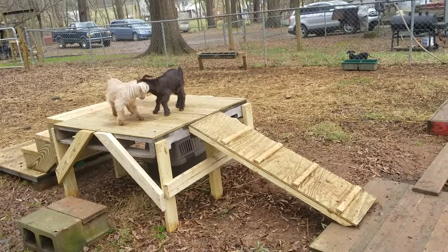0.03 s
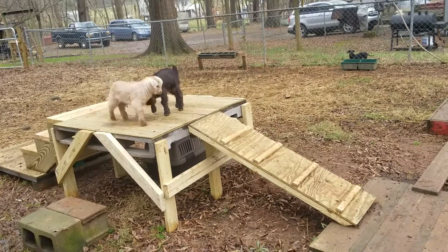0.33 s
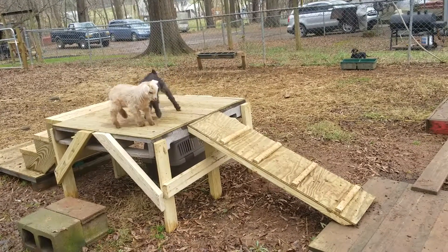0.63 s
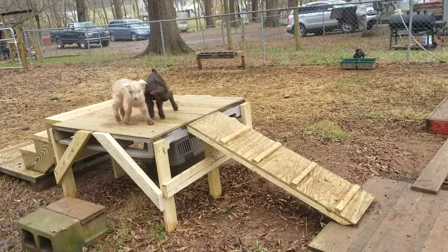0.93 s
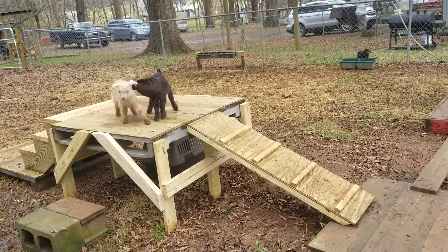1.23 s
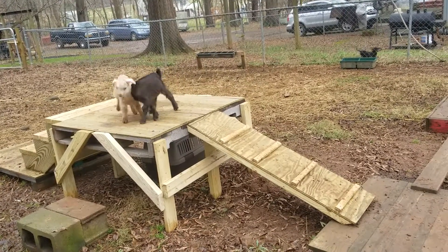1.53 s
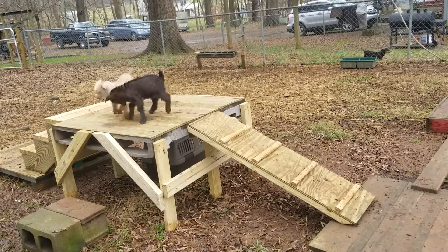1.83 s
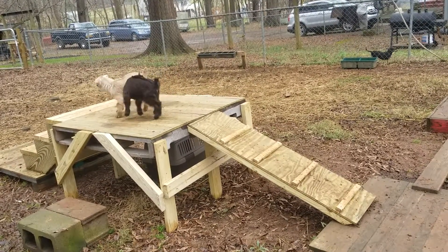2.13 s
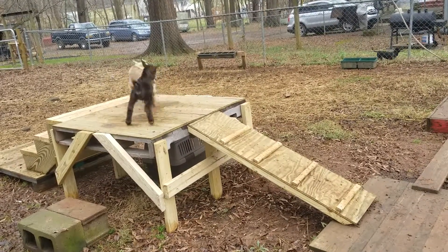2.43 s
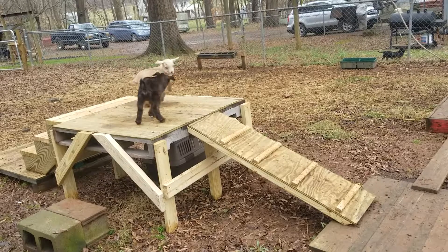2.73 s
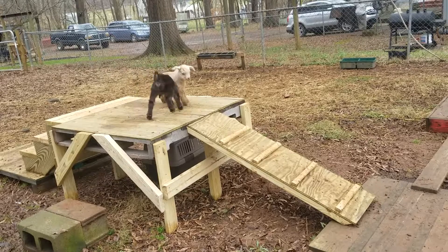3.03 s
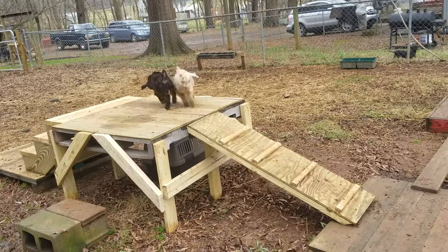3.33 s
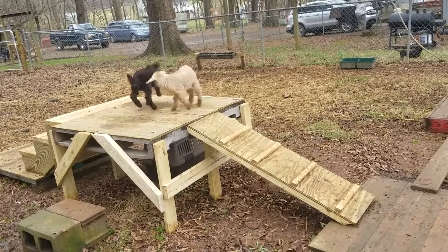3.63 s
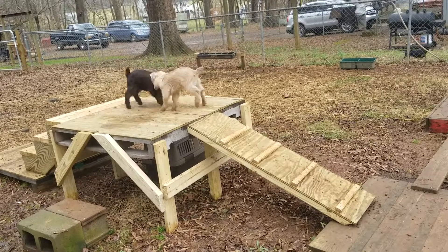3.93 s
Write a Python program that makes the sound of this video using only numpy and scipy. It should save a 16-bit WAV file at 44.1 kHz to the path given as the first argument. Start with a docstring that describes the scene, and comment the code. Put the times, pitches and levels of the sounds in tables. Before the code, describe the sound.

Hooves of two young goats tick and thud unevenly on a raised wooden deck a few metres away, with gritty scuffs between steps. The pattering grows busiest late on, over faint rustling, light wind and a distant hum.

```python
"""Sharp little hoof ticks and hollow thuds: two goat kids step, hop and scuffle on a raised plywood deck.
They are a few metres away in a yard. Each hoof ticks on the surface, knocks the board and makes the
deck thud; between steps the hooves drag over grit. A distant engine-like hum, a light breeze and faint
rustling lie behind. The goats sound much duller in the right microphone than in the left."""
import sys
import numpy as np
from scipy import signal
from scipy.fft import rfft, irfft
from scipy.io import wavfile

SR = 44100
rng = np.random.default_rng(int(sys.argv[2]) if len(sys.argv) > 2 else 0)


def materialize(psi):
    """Save the field psi as 16-bit PCM at rate SR to the path in sys.argv[1].

    A 1-D psi becomes a single channel; in a 2-D psi each row is a channel.
    """
    bounded = np.clip(np.atleast_2d(psi).T, -1, 1)
    quanta = np.round(bounded * 32767).astype(np.int16)
    wavfile.write(sys.argv[1], SR, quanta)


N = 176400
TIME = np.arange(N) / SR

# Tone curves and mode gains are relative; cue levels are trimmed in each layer.
# Low outdoor rumble with thin hiss on top: freq_hz, gain_db
YARD_TONE = [(15, -18), (28, -23), (42, -1), (62, 0.5), (95, 4), (130, -3), (200, -8), (300, -19),
             (500, -31.5), (900, -30.5), (1200, -34), (1520, -25), (2000, -35), (4000, -38.5),
             (9000, -41.5), (13000, -37.5), (16000, -40.5)]
# How alike the yard air is left and right: freq_hz, correlation
YARD_LIKENESS = [(30, 0.066), (80, 1), (200, 0.98), (600, 0.26), (1500, 0), (4000, 0)]
# Fader ride of the far hum: time_s, level_db
HUM_RIDE = [(0, -55.5), (.7, -54), (1.8, -53.5), (2.6, -55), (3.3, -59.5), (4, -60.5)]
# Wind brushing the left microphone: freq_hz, gain_db
WIND_TONE = [(12, -28), (28, -15), (45, 14), (75, 1.5), (140, 4), (220, -19.5), (400, -26), (1200, -47.5)]
# Fader ride of the faint rustling: time_s, level_db
RUSTLE_RIDE = [(0, -68), (.2, -72), (.26, -55.5), (.44, -61.5), (.57, -54.5), (.8, -59.5), (.92, -63),
               (1.25, -57.5), (1.46, -65), (1.62, -59.5), (1.8, -59), (2.05, -55), (2.28, -64.5),
               (2.46, -62), (2.7, -59), (3.2, -56.5), (3.7, -58), (4, -60.5)]
# Papery crackle of dry litter: freq_hz, gain_db
RUSTLE_TONE = [(900, -42.5), (1450, -7), (2100, -36.5), (3800, -20), (4900, -8.5), (6000, -3),
               (6700, -10.5), (7400, -33), (10600, -21.5), (15000, -39)]
# Cues for dragged hooves; each swells by swell_db to reach its levels at the end of the stroke:
# start_s, length_s, grit_db, board_db, sand_db, swell_db
SCUFF_CUES = [(0.259, 0.028, -42, -61, -90, 9), (0.47, 0.073, -51, -64, -68.5, 0.5),
              (0.673, 0.13, -59, -69, -78, -3), (1.177, 0.07, -60.5, -69, -95, -4),
              (1.257, 0.047, -47, -67, -79, 6), (1.322, 0.062, -46, -70, -67, -0.5),
              (1.861, 0.077, -49.5, -59, -80, -2), (1.932, 0.053, -46.5, -73, -71, 10),
              (2.13, 0.079, -46.5, -64, -60, 9.5), (2.323, 0.058, -44, -60, -57.5, 6.5),
              (2.577, 0.038, -49.5, -63.5, -73, -9), (2.703, 0.039, -54.5, -67, -91, -2.5),
              (3.03, 0.051, -55.5, -65, -84, -10), (3.144, 0.04, -33, -53.5, -62, 15.5),
              (3.242, 0.013, -44, -92, -59, -4), (3.267, 0.01, -40.5, -50, -61, 9),
              (3.651, 0.065, -65, -64, -76, 0), (3.772, 0.059, -47, -87, -76, 13),
              (3.901, 0.096, -42, -76, -59, 4.5)]
# Rasp of coarse grit: freq_hz, gain_db
GRIT_TONE = [(800, -25.5), (2000, -8.5), (3200, -11.5), (4200, -4.5), (5200, -3.5), (6000, 3.5),
             (6600, -10), (7600, -24), (9300, -53), (16000, -53)]
# Sizzle of fine sand: freq_hz, gain_db
SAND_TONE = [(6500, -50), (8000, -33), (9500, -10), (10500, 1), (11400, -8), (12600, -16), (16000, -41)]
# Low grumble of the deck under a drag: freq_hz, gain_db
DRAG_TONE = [(60, -30.5), (160, -15.5), (310, 4), (450, -4.5), (650, -32.5), (1500, -36.5)]
# Cues for hoof landings: start_s, thud_db, thud_pitch_hz, knock_db, tick_db, crack_db
HOOF_CUES = [(0.031, -61, 167, -65.5, -50.5, -55), (0.216, -45.5, 280.6, -63.5, -59, -78),
             (0.277, -80, 201, -75, -48, -68), (0.289, -63, 200, -62, -40, -52),
             (0.368, -45, 285, -67.5, -54.5, -52), (0.464, -41.5, 230, -67.5, -49, -60),
             (0.511, -65, 266, -61, -51.5, -48), (0.646, -46, 324, -55, -39, -34),
             (0.741, -48.5, 270, -86, -47.5, -47), (0.93, -61, 249, -53.5, -54, -41),
             (1.165, -44, 261, -51.5, -54, -68), (1.201, -47, 148, -56, -45.5, -41.5),
             (1.369, -46, 221, -83, -42, -39.5), (1.531, -40, 218, -62.5, -49, -56),
             (1.549, -33, 171, -70, -54, -53), (1.605, -44, 180, -57, -47.5, -55),
             (1.694, -71, 170, -84, -39, -74), (1.726, -29, 201, -42, -33, -67),
             (1.858, -79, 210, -60, -45, -59), (1.874, -56, 292, -74, -46, -67),
             (1.975, -35, 159, -68, -56, -44), (2.167, -58, 208, -53.5, -44.5, -64),
             (2.186, -36, 307, -53.5, -67, -54), (2.206, -46, 285, -58, -41, -43),
             (2.329, -53, 276, -63, -48.5, -73), (2.341, -36.5, 221, -81, -44, -70),
             (2.53, -48, 169, -50.5, -44, -40), (2.558, -32, 293, -48.5, -36.5, -32),
             (2.699, -58.5, 180, -63.5, -43.5, -58), (2.895, -41, 324, -53.5, -43.5, -40),
             (2.961, -42.5, 294, -47.5, -42, -50), (2.972, -30.5, 334, -48, -33.5, -22.5),
             (3.013, -50, 178, -58, -44, -33.5), (3.021, -32.5, 333, -43.5, -34.5, -34),
             (3.101, -41, 324, -53.5, -51.5, -47), (3.141, -33.5, 454, -44, -43, -34),
             (3.197, -51, 292, -48, -39.5, -30.5), (3.282, -47.5, 353, -55.5, -41.5, -46),
             (3.354, -49, 209, -57, -66, -46), (3.412, -48, 188, -69, -49, -81),
             (3.525, -49.5, 216, -59, -49, -65), (3.558, -50, 302, -52, -48, -51),
             (3.652, -48, 157.5, -54.5, -63, -83), (3.687, -44, 292, -83, -54, -76),
             (3.798, -76, 202, -70, -44.5, -70), (3.91, -42.5, 318, -61.5, -42.5, -74),
             (3.923, -44, 277, -74, -37, -65)]
# Low modes of the whole deck: pitch_hz, gain_db, t60_s
DECK_MODES = [(113.4, -13, 0.3), (151, 12, 0.082), (169.7, -1.5, 0.095), (218, 2, 0.15), (285.8, 0, 0.14),
              (337.1, 4.5, 0.12), (384.4, -1.5, .1), (449.7, -7, 0.088), (563, -23, 0.24)]
# Upper modes of the plywood board: pitch_hz, gain_db
BOARD_MODES = [(480, 2.5), (535, -3), (600, -4), (680, -10), (800, 7), (950, 8), (1160, 5.5), (1340, -11),
               (1510, 12), (1630, -3.5), (1960, 11), (2130, -5), (2330, -13)]
# Woody knock of the board: freq_hz, gain_db
KNOCK_TONE = [(250, -12.5), (550, -6), (850, 3), (1050, -1), (1250, -2.5), (1580, 9), (1950, 0.5),
              (2300, -0.5), (2800, -4.5), (4000, -12), (6500, -19.5), (8000, -45.5)]
# Bright tick of horn on the surface: freq_hz, gain_db
TICK_TONE = [(1200, -29), (3100, -50.5), (3900, -20), (4700, 4.5), (5300, 3), (5950, 11), (6600, -2),
             (7600, -30.5), (9300, -47), (10500, -19.5), (12500, -43), (16000, -42)]
# Crack of a hard landing: freq_hz, gain_db
CRACK_TONE = [(1200, -28.5), (2000, -15.5), (2320, 0), (2750, -5.5), (3300, -1), (3500, -11), (3700, -0.5),
              (4600, -1), (6500, -18), (8000, -40)]
# Dull right microphone, relative to the left: freq_hz, gain_db
RIGHT_MIC_TONE = [(100, -2), (300, -1.5), (450, 7), (800, -2), (1700, -2), (2200, -12), (2800, -13.5),
                  (3300, -17.5), (4000, -35.5), (6000, -46.5), (9000, -24.5), (16000, -39.5)]

YARD_DB, WIND_DB, GUST_DB = -57.5, -60.5, 5.5
HUM_HZ, HUM_WANDER_HZ, HUM_WAVER_DB = 77.9, 4.14, 0.3
RUSTLE_TRIM_DB, SPECK_DB, JUDDER_DB = -7, -75, 2.5
SCUFF_ATTACK_S, SCUFF_RELEASE_S = 0.011, 0.011
GRIT_TRIM_DB, SAND_TRIM_DB, SCRAPE_TRIM_DB, DRAG_BOOST_DB = -7, -7.5, -3, 3
THUD_TRIM_DB, THUD_DELAY_CYCLES, FLEX_CYCLES, DECK_RING_DB = 1, 0.613, 0.56, -4
EDGE_RETURN_S, EDGE_RETURN_DB = 0.01531, -8  # the bending wave returns from the deck's edge
BOARD_TRIM_DB, BOARD_T60_S, BOARD_SCATTER_DB = -1, 0.053, 6.5
KNOCK_TRIM_DB, KNOCK_RISE_S, KNOCK_T60_S = 1.5, 0.00096, 0.098
TICK_TRIM_DB, TICK_RISE_S, TICK_T60_S, TICK_TAIL_DB, TICK_TAIL_T60_S = 5.5, 0.0004, 0.01, -22, 0.06
CRACK_TRIM_DB, CRACK_T60_S = -10, 0.031
DECK_SPREAD_DB, YARD_ECHO_DB, RIGHT_LAG_S, CUTOFF_HZ = -10, -23, 0.00006, 15900


def from_db(db):
    """Decibels to gain."""
    return 10 ** (np.asarray(db) / 20)


def unit_rms(x):
    """Scale to unit power."""
    return x / np.sqrt(np.mean(x ** 2) + 1e-20)


def on_fft_grid(curve, size):
    """Read a curve at every FFT bin, along a log frequency axis."""
    hz, value = np.transpose(curve)
    return np.interp(np.log(np.arange(size // 2 + 1) * SR / size + 1), np.log(hz), value)


def impulse_response(tone, size=4096):
    """Minimum-phase filter with the given tone curve."""
    cepstrum = irfft(np.log(from_db(on_fft_grid(tone, size))))
    cepstrum[1:size // 2] *= 2
    cepstrum[size // 2 + 1:] = 0
    return irfft(np.exp(rfft(cepstrum)))


def colour(x, tone):
    """EQ a white signal, keeping its power."""
    impulse = impulse_response(tone)
    return signal.fftconvolve(x, impulse / np.linalg.norm(impulse))[:N]


def drift(corner_hz):
    """Smooth random wobble of unit power, mostly slower than the corner."""
    hz = np.arange(N // 2 + 1) * SR / N
    return unit_rms(irfft(rfft(rng.standard_normal(N)) / (1 + (hz / corner_hz) ** 2), N))


def add(track, start_s, sound):
    """Drop a sound onto a track."""
    i = max(int(start_s * SR), 0)
    track[i:i + len(sound)] += sound[:len(track[i:])]


def burst(t, rise_s, t60_s):
    """Envelope with a quick rise and an exponential decay."""
    return (1 - np.exp(-t / rise_s)) * from_db(-60 * t / t60_s)


def signs(count):
    """Random polarities; a long run of them is white noise."""
    return rng.choice([-1, 1], count)


def grains(per_s, spread_db):
    """Random clicks of uneven size, at unit power."""
    sizes = from_db(spread_db * np.minimum(rng.exponential(1, N), 5))
    return unit_rms((rng.random(N) < per_s / SR) * sizes * signs(N))


def yard_air():
    """A steady bed of outdoor rumble, mostly centred, and thin wide hiss."""
    alike = np.clip(on_fft_grid(YARD_LIKENESS, N), -1, 1)
    mid, side = rfft(rng.standard_normal((2, N)))
    stereo = np.sqrt(1 + alike) * mid + np.sqrt(1 - alike) * side * [[1], [-1]]
    air = irfft(from_db(on_fft_grid(YARD_TONE, N)) * stereo, N)
    return from_db(YARD_DB) * unit_rms(air)


def far_hum():
    """One low engine-like tone, unsteady in pitch and level."""
    pitch_hz = HUM_HZ + HUM_WANDER_HZ * drift(corner_hz=10)
    hum = np.sin(2 * np.pi * np.cumsum(pitch_hz) / SR) * from_db(HUM_WAVER_DB * drift(corner_hz=2))
    return from_db(np.interp(TIME, *np.transpose(HUM_RIDE))) * unit_rms(hum)


def breeze():
    """Light gusts brush the left microphone with a low flutter."""
    wind = colour(rng.standard_normal(N), WIND_TONE) * from_db(WIND_DB + GUST_DB * drift(corner_hz=8.4))
    return wind * [[1], [0]]


def rustle():
    """Fine crackle of dry litter and shuffling feet."""
    ride_db = np.interp(TIME, *np.transpose(RUSTLE_RIDE))
    crackle = unit_rms(grains(per_s=1600, spread_db=-1.5) * from_db(JUDDER_DB * drift(corner_hz=27)))
    return colour(crackle * from_db(ride_db + RUSTLE_TRIM_DB), RUSTLE_TONE)


def grit_specks():
    """Lone bits of grit snap under the shifting hooves."""
    return from_db(SPECK_DB) * colour(grains(per_s=30, spread_db=1.5), TICK_TONE)


def hoof_scuffs():
    """A dragged hoof judders over grit and sand, which hiss and shake the board."""
    grit, board, sand = np.zeros((3, N))
    for start_s, length_s, grit_db, board_db, sand_db, swell_db in SCUFF_CUES:
        age_s = TIME - start_s
        attack = np.clip(age_s / SCUFF_ATTACK_S, 0, 1)
        release = np.exp(-np.maximum(age_s - length_s, 0) / SCUFF_RELEASE_S)
        swell = from_db(swell_db * (np.clip(age_s / length_s, 0, 1) - 1))
        stroke = attack * release * swell
        grit += from_db(grit_db + GRIT_TRIM_DB) * stroke
        board += from_db(board_db + SCRAPE_TRIM_DB) * stroke
        sand += from_db(sand_db + SAND_TRIM_DB) * stroke
    slips = unit_rms(grains(per_s=3000, spread_db=3.3) * from_db(JUDDER_DB * drift(corner_hz=60)))
    hiss = colour(slips * grit, GRIT_TONE) + colour(slips * sand, SAND_TONE)
    scrape = colour(slips * board, KNOCK_TONE)
    grumble = from_db(DRAG_BOOST_DB) * colour(slips * board, DRAG_TONE)
    return hiss + scrape + grumble


def deck_thuds():
    """The board flexes for a few cycles under each hoof and sets the whole deck ringing."""
    track, t = np.zeros(N), TIME[:SR // 4]
    for start_s, thud_db, pitch_hz, *_ in HOOF_CUES:
        rise_s = FLEX_CYCLES / pitch_hz
        flex = t / rise_s * np.exp(1 - t / rise_s) * np.sin(2 * np.pi * pitch_hz * t)
        ring = np.zeros(len(t))
        for sign, (mode_hz, gain_db, t60_s) in zip(signs(len(DECK_MODES)), DECK_MODES):
            # Modes more than an octave above the thud are barely driven.
            strength = sign * from_db(gain_db) / (1 + (mode_hz / pitch_hz / 2) ** 4)
            ring += strength * np.sin(2 * np.pi * mode_hz * t) * burst(t, rise_s, t60_s)
        thud = flex + from_db(DECK_RING_DB) * ring / np.abs(ring).max()
        add(thud, EDGE_RETURN_S * rng.uniform(0.693, 1.266), from_db(EDGE_RETURN_DB) * flex)
        thud /= np.abs(thud).max()
        add(track, start_s + THUD_DELAY_CYCLES / pitch_hz, from_db(thud_db + THUD_TRIM_DB) * thud)
    return track


def board_ring():
    """Every hoof lands on a new spot, so the board's modes ring in a new balance."""
    track, t = np.zeros(N), TIME[:SR // 4]
    pitch_hz, gain_db = np.transpose(BOARD_MODES)
    modes = np.sin(2 * np.pi * pitch_hz[:, None] * t) * burst(t, KNOCK_RISE_S, BOARD_T60_S)
    for start_s, _, _, knock_db, *_ in HOOF_CUES:
        strengths = from_db(gain_db + rng.normal(0, BOARD_SCATTER_DB, len(modes))) * signs(len(modes))
        strengths /= np.linalg.norm(strengths)
        add(track, start_s, from_db(knock_db + BOARD_TRIM_DB) * strengths @ modes)
    return track


def hoof_taps():
    """Horn on wood: a sharp tick, a crack on hard landings and a knock in the board's dense modes."""
    knock, tick, crack = np.zeros((3, N))
    t = TIME[:SR // 4]
    tick_tail = from_db(TICK_TAIL_DB) * burst(t, TICK_RISE_S, TICK_TAIL_T60_S)
    tick_shape = burst(t, TICK_RISE_S, TICK_T60_S) + tick_tail
    for start_s, _, _, knock_db, tick_db, crack_db in HOOF_CUES:
        add(knock, start_s, from_db(knock_db + KNOCK_TRIM_DB) * burst(t, KNOCK_RISE_S, KNOCK_T60_S))
        add(tick, start_s, from_db(tick_db + TICK_TRIM_DB) * tick_shape)
        add(crack, start_s, from_db(crack_db + CRACK_TRIM_DB) * burst(t, TICK_RISE_S, CRACK_T60_S))
    layers = (knock, KNOCK_TONE), (tick, TICK_TONE), (crack, CRACK_TONE)
    return sum(colour(envelope * signs(N), tone) for envelope, tone in layers)


def echoes(x, rise_s, t60_s):
    """Reverb from many scattered paths, different for each side."""
    t = TIME[:SR // 2]
    tails = rng.standard_normal((2, len(t))) * burst(t, rise_s, t60_s)
    return np.array([signal.fftconvolve(x, tail / np.linalg.norm(tail))[:N] for tail in tails])


def scene():
    """The wide deck radiates from many places and the yard echoes faintly; the right is late and dull."""
    wood = deck_thuds() + board_ring() + hoof_scuffs()
    goats = wood + hoof_taps() + grit_specks() + rustle()
    deck_spread = from_db(DECK_SPREAD_DB) * echoes(wood, rise_s=0.0025, t60_s=0.053)
    yard_echo = from_db(YARD_ECHO_DB) * echoes(goats, rise_s=0.037, t60_s=0.28)
    left, right = goats + deck_spread + yard_echo
    right = signal.fftconvolve(right, impulse_response(RIGHT_MIC_TONE))[:N]
    right = np.interp(TIME - RIGHT_LAG_S, TIME, right)
    return np.array([left, right]) + yard_air() + far_hum() + breeze()


def record(dry):
    """A steep low-pass shaves off the very top."""
    return signal.sosfilt(signal.ellip(10, .1, 70, CUTOFF_HZ, fs=SR, output="sos"), dry)


dry = scene()
out = record(dry)
materialize(out)
```